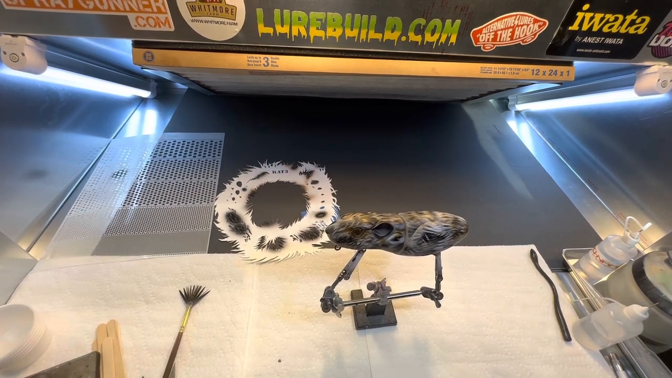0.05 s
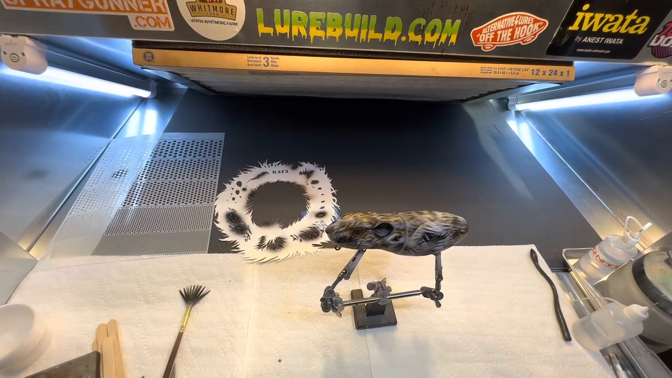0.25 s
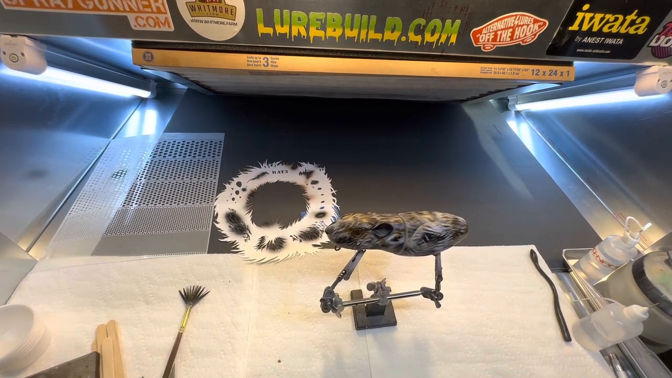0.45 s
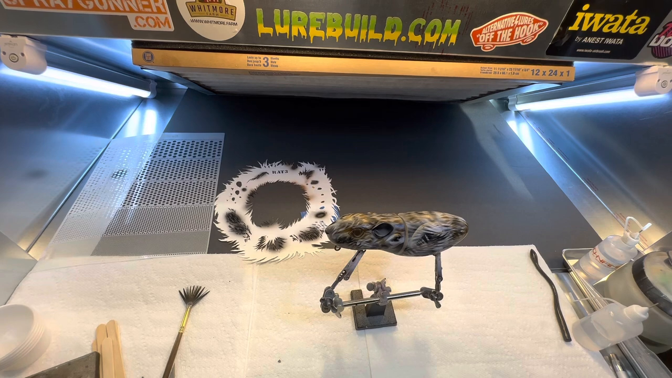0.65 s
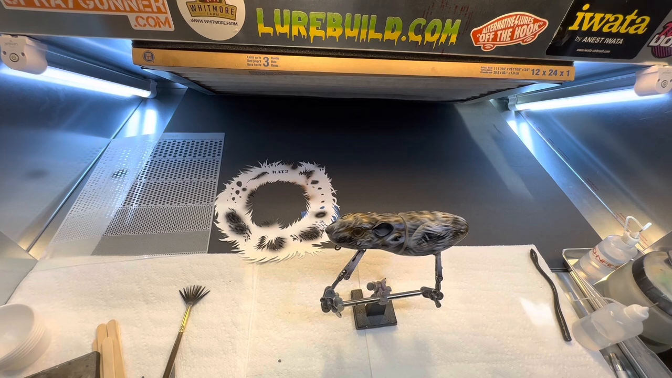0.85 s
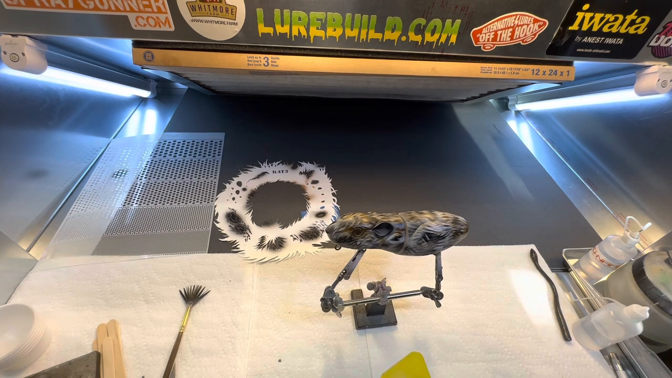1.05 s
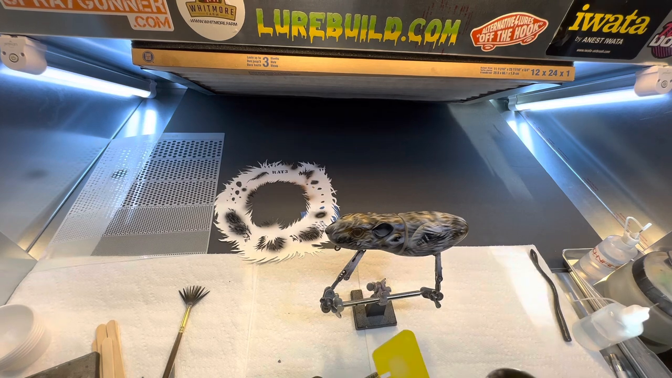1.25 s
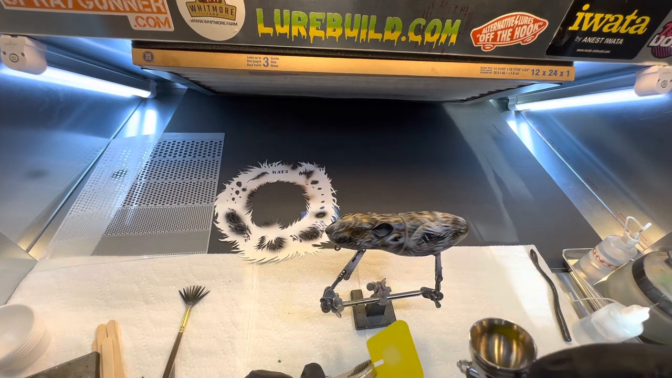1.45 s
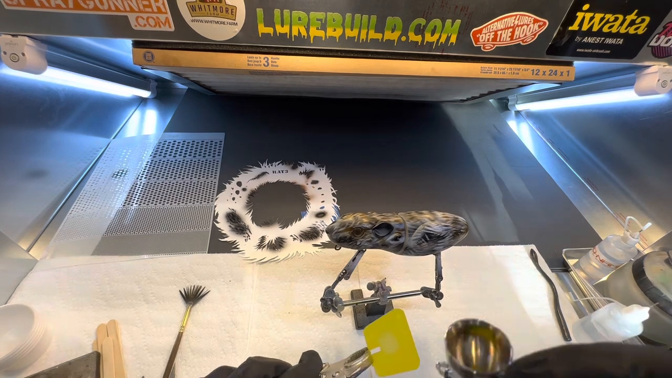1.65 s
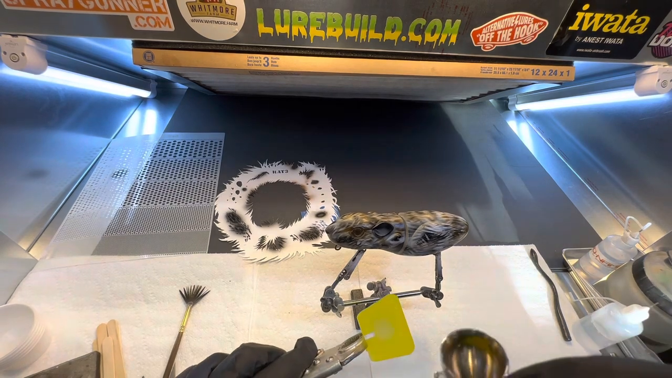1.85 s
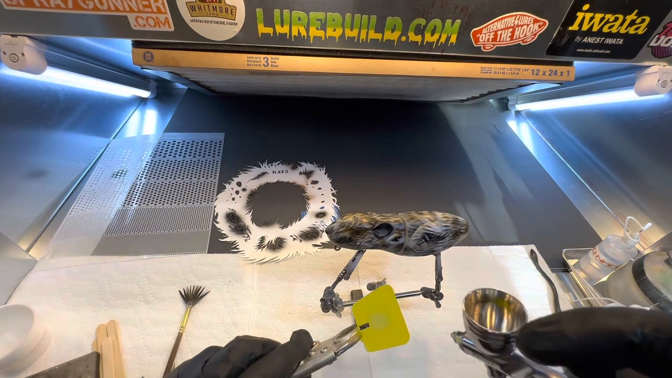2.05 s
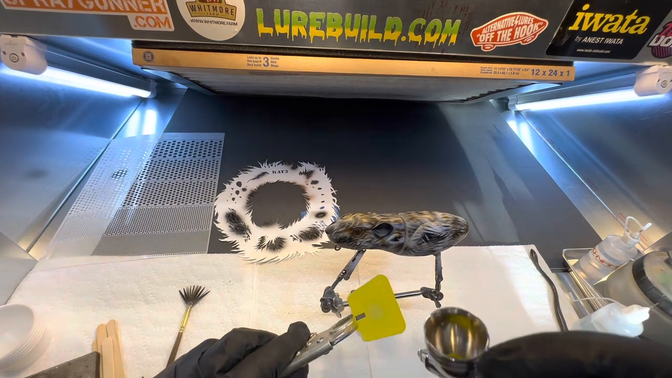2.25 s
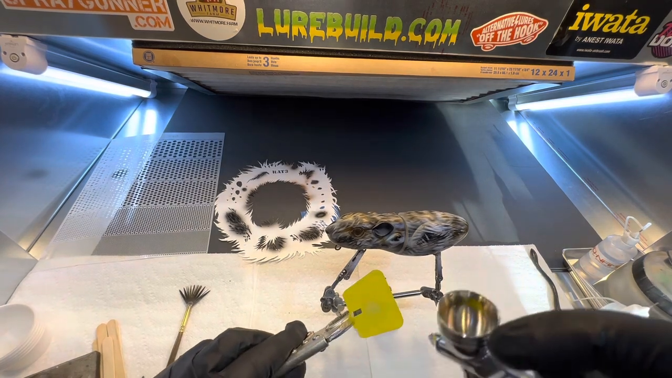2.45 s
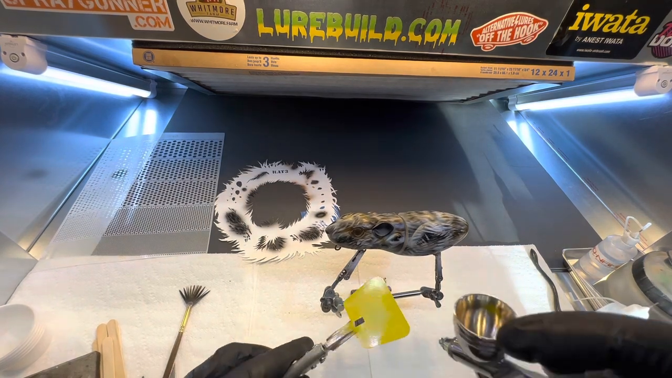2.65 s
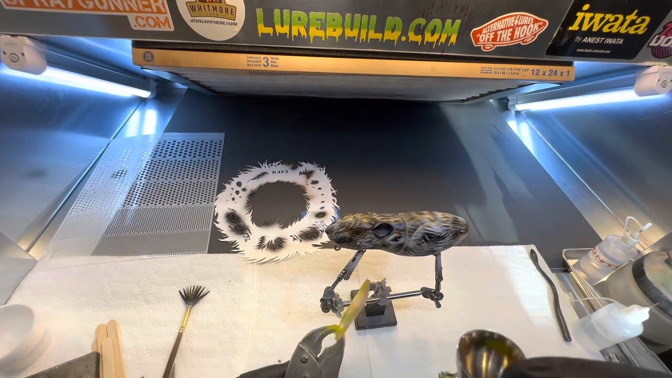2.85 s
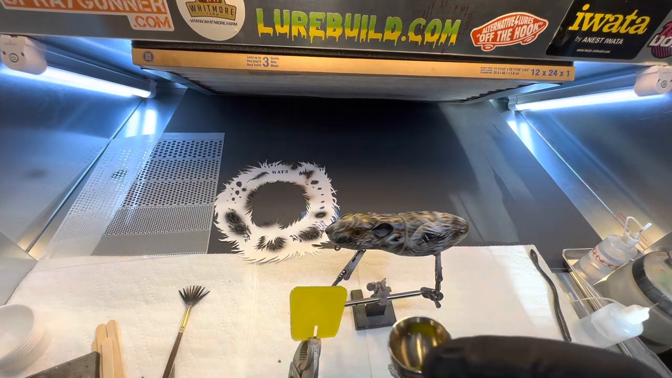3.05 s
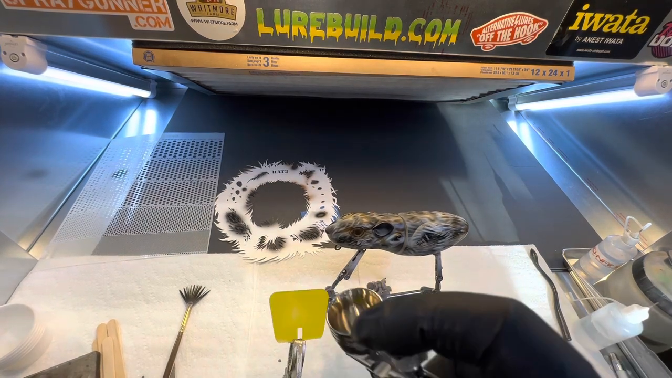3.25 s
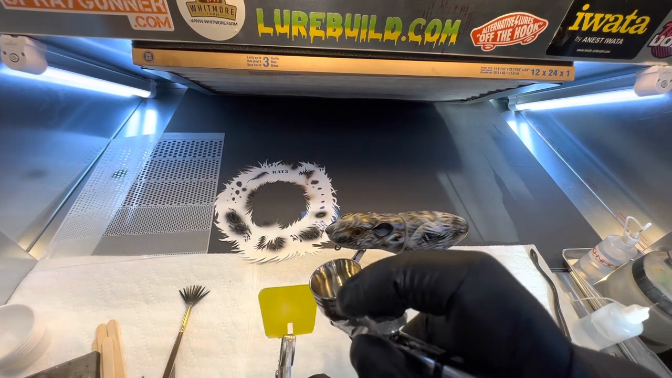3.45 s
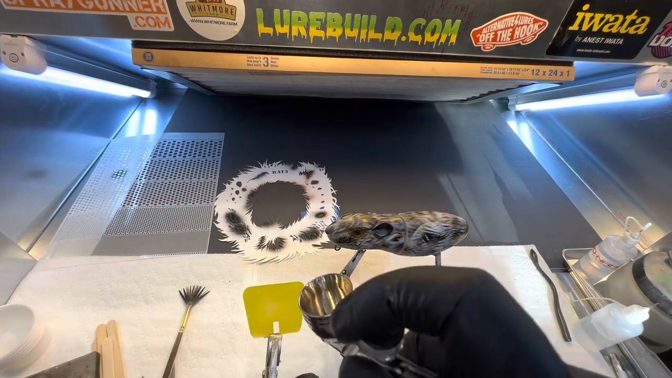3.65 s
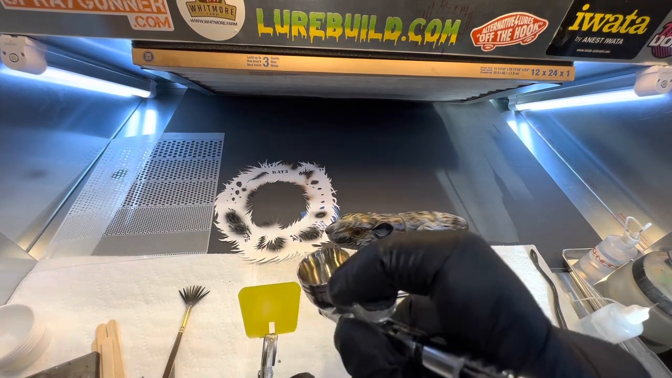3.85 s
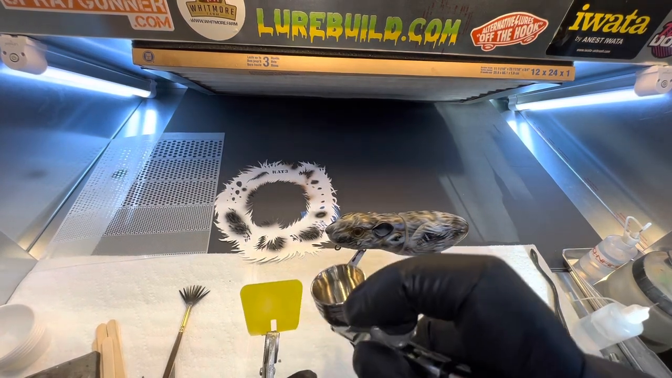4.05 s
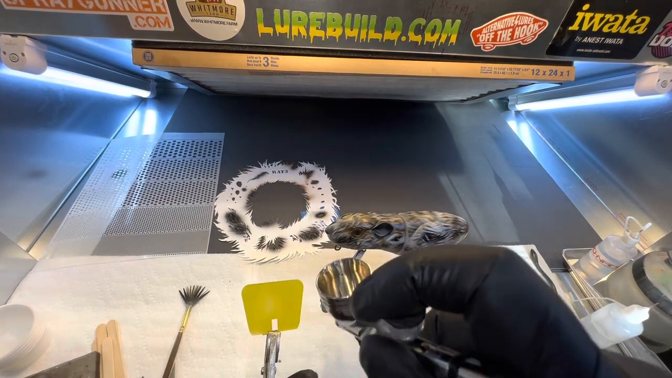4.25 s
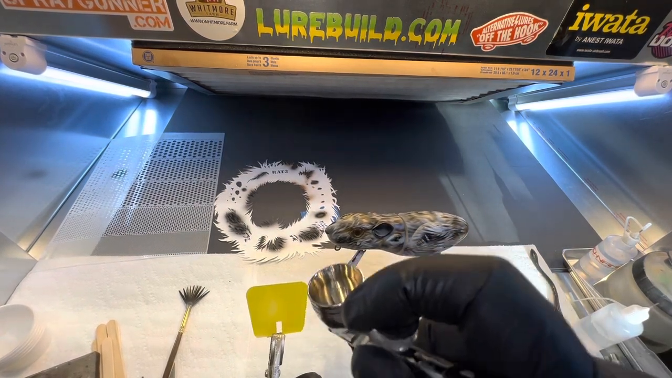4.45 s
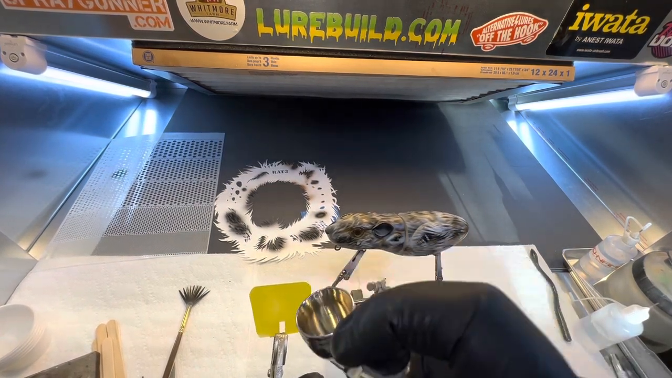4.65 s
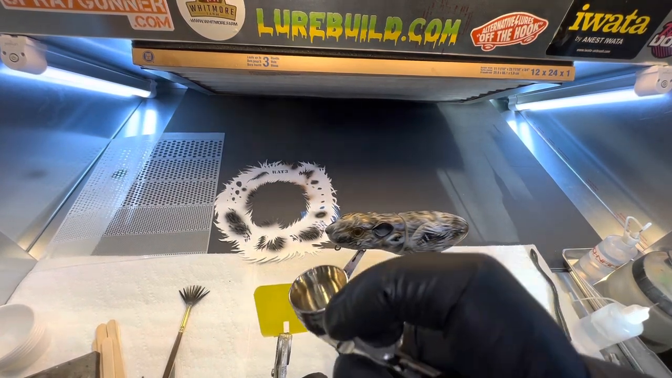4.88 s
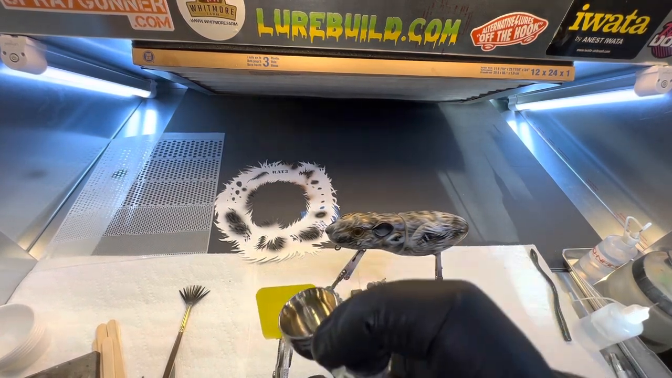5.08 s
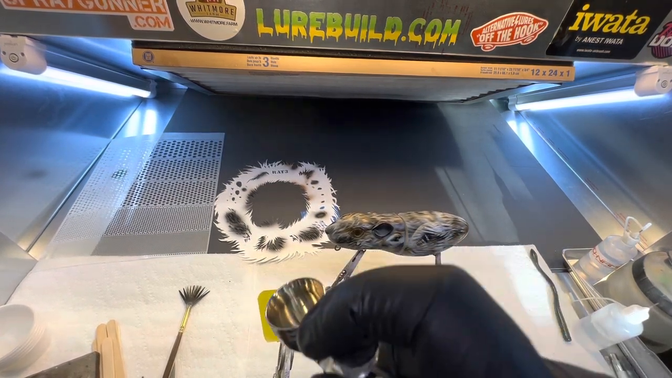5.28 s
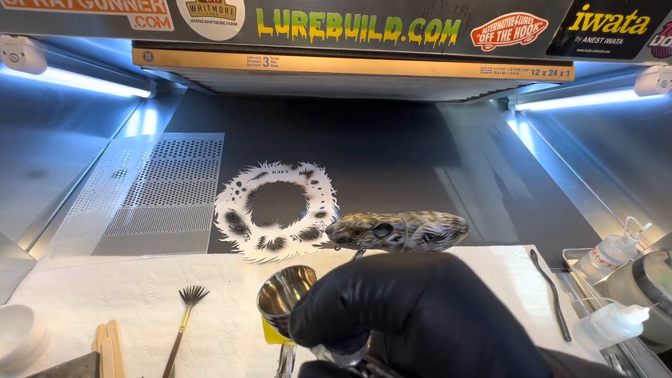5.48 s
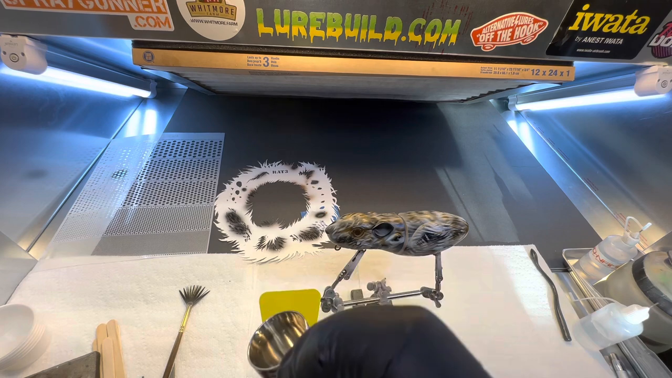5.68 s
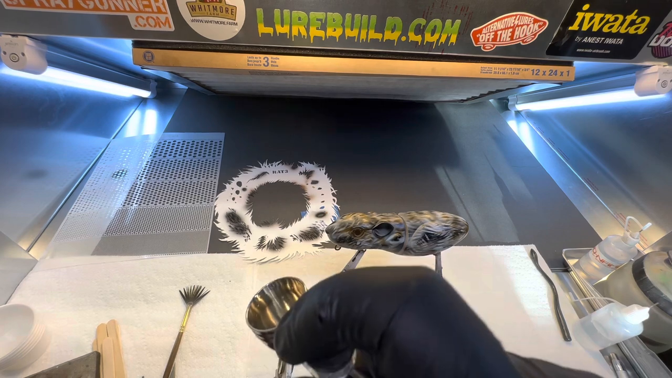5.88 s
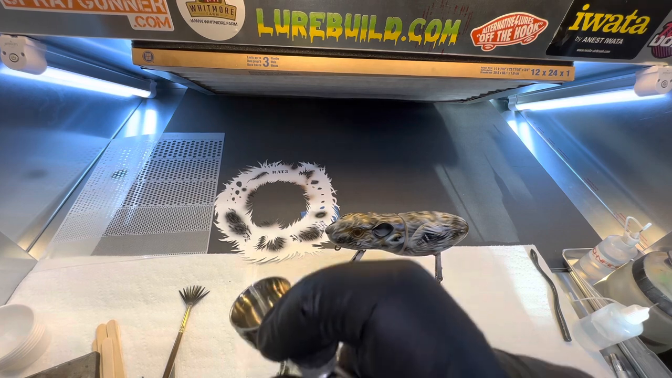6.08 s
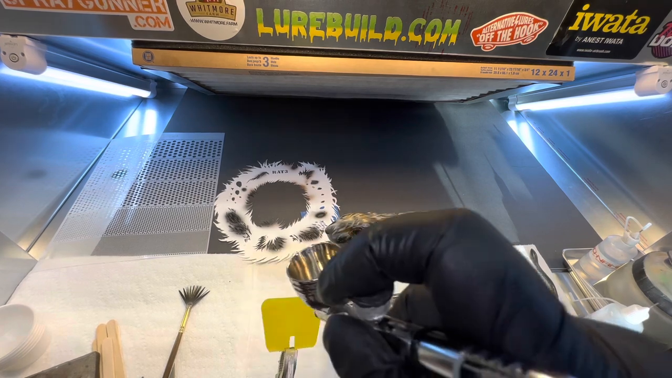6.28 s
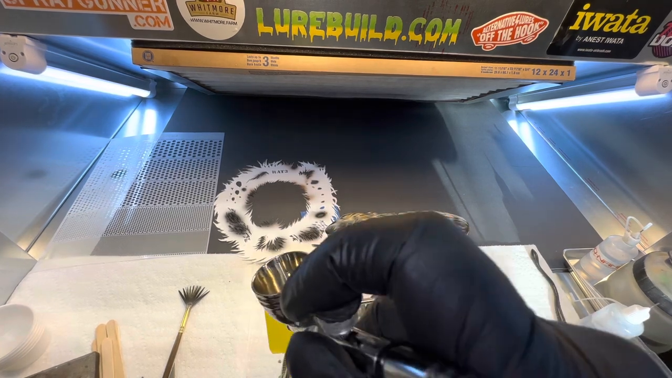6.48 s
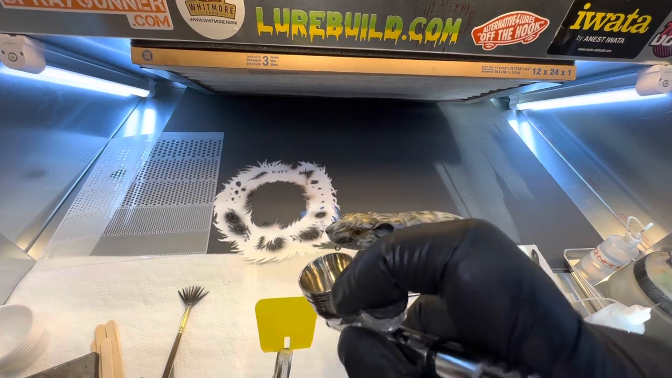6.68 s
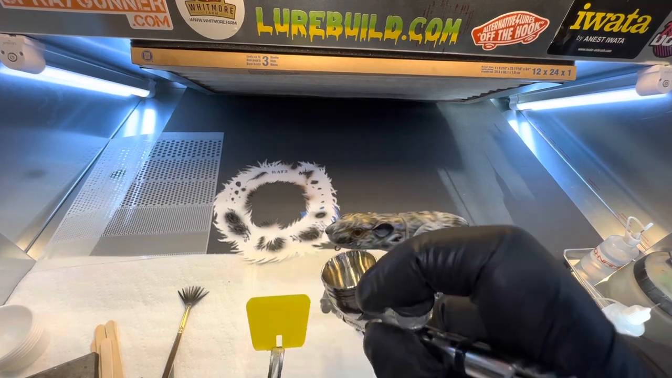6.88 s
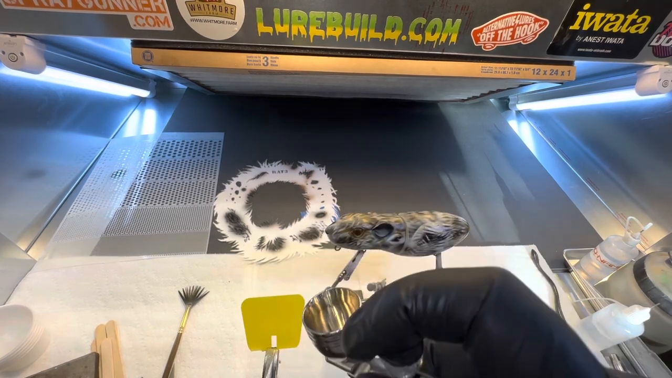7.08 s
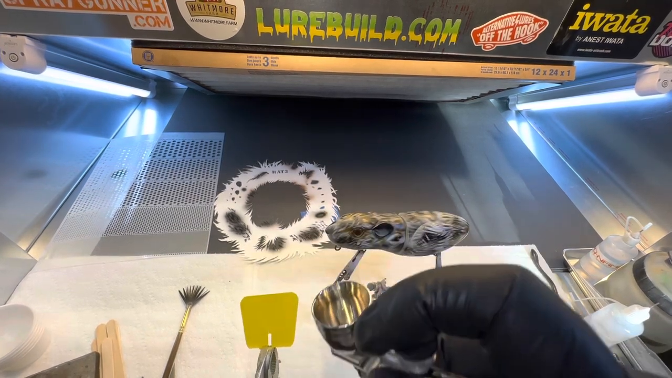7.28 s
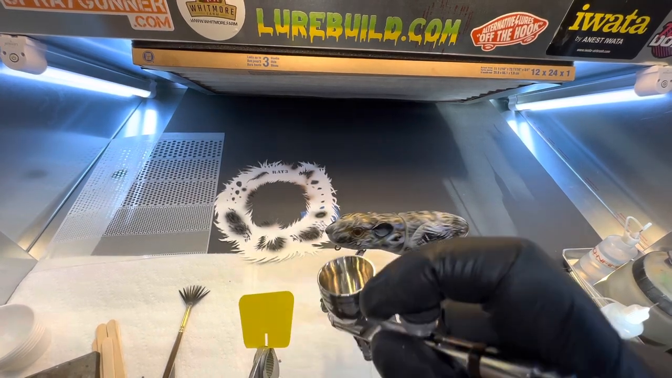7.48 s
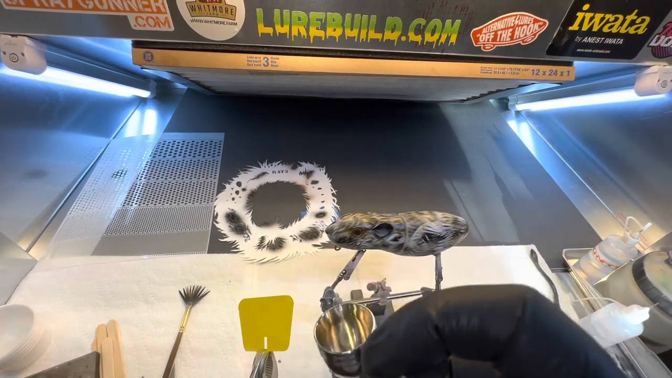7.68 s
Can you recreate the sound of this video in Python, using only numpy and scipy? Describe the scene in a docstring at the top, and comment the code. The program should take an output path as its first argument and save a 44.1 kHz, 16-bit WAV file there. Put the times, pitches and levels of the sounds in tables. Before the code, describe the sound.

A spray booth fan rumbles and booms unevenly under a bright, fluttering airbrush hiss. A mid-pitched rush fades early, and something taps the bench with quick bounces. A switch snaps with a puff of air and a brief falling whistle; a small piston compressor catches and throbs. The airbrush stops for under a second, then sprays a card close to the stereo microphones over the steady motor.

```python
"""Spray booth with a compressor start

An exhaust fan rumbles and booms as shaped noise, and an airbrush hisses as high, fluttering noise.
A tap and a switch snap ring the bench and puff air; vented air whistles downward as a sinking sine.
A twin-piston compressor starts and throbs, built from multiples of its shaft speed, magnetic tones and
intake noise. The airbrush pauses, then sprays a card close to the microphones."""
import sys
import numpy as np
from scipy import signal
from scipy.fft import rfft, irfft, next_fast_len
from scipy.io import wavfile
from scipy.ndimage import uniform_filter1d, map_coordinates

SR = 44100
rng = np.random.default_rng(int(sys.argv[2]) if len(sys.argv) > 2 else 0)


def master_out(mix):
    """Clip the mix to full scale and print it as 16-bit PCM to the path in sys.argv[1]."""
    frames = np.transpose(np.atleast_2d(mix))
    ceiling = np.clip(frames, -1, 1)
    pcm = np.round(ceiling * 32767).astype(np.int16)
    wavfile.write(sys.argv[1], SR, pcm)


N = 340452


def amp(db):
    """Gain of a level in dB."""
    return 10 ** (np.asarray(db) / 20)


def unit(x):
    """x at rms 1."""
    return x / np.sqrt(np.mean(x ** 2))


def columns(rows, at, scale=lambda v: v):
    """Every column after the first, interpolated at the given places."""
    first, *cols = np.transpose(rows)
    return np.array([np.interp(scale(at), scale(first), c) for c in cols])


def wobble(rate, step=1):
    """A smooth random curve, rate knots a second, read at every step-th sample."""
    knots = rng.standard_normal(int(N * rate / SR) + 4)
    return map_coordinates(knots, [np.arange(0, N, step) * rate / SR])


def ramp(t, start_s, length_s):
    """0 before start_s, 1 once length_s has passed."""
    return np.clip((t - start_s) / length_s, 0, 1)


# how alike left and right are in broad noise, by frequency, with opposite phase around 10.4-11.9 kHz:
# (frequency [Hz], likeness [0-1], phase by which left leads [rad])
STEREO_LIKENESS = [(60, .97, 0), (200, .97, 0), (340, .8, 0), (600, .3, 2), (1500, .35, 2), (2500, .3, 1.8),
                   (7500, .15, 2), (9900, .5, 1), (10400, 1, np.pi), (11900, 1, np.pi), (13000, .75, 5),
                   (13900, 1, 2 * np.pi), (15000, 1, 2 * np.pi), (15800, .55, 7)]


def rush(spectrum, patchy_db):
    """Air noise of a given spectrum [dB per Hz], in patches of random gain, spread over left and right."""
    grains = signal.stft(rng.standard_normal((2, N)), nperseg=512)[2]
    patches = uniform_filter1d(rng.standard_normal(grains.shape[1:]), 6, axis=0)  # across frequency
    patches = uniform_filter1d(patches, 14, axis=1)  # across time
    pair = signal.istft(grains * amp(patchy_db * unit(patches)), nperseg=512)[1][:, :N]
    m = next_fast_len(N)
    a, b = rfft(unit(pair), m)
    hz = np.fft.rfftfreq(m, 1 / SR) + 1  # keeps the logarithm finite
    alike, lead = columns(STEREO_LIKENESS, hz, np.log)
    # mixing two independent noises sets how alike left and right are
    turn = np.arccos(np.clip(alike, 0, 1)) / 2
    left = (np.cos(turn) * a + np.sin(turn) * b) * np.exp(1j * lead / 2)
    right = (np.cos(turn) * a - np.sin(turn) * b) * np.exp(-1j * lead / 2)
    levels = amp(columns(spectrum, hz, np.log))
    return np.sqrt(SR / 2) * irfft(levels * [left, right], m)[:, :N]


# exhaust fan and duct, before the slow swell: (frequency [Hz], left [dB per Hz], right [dB per Hz])
FAN_SPECTRUM = [(25, -78, -78), (45, -74, -76), (65, -67, -68), (75, -59, -60), (86, -66, -67),
                (100, -65, -67), (155, -59, -60), (200, -65, -67), (240, -65, -68), (290, -62, -65),
                (335, -61, -66), (375, -70, -73), (450, -71, -69), (700, -73, -76), (850, -72, -74),
                (1250, -78, -80), (1600, -80, -81), (1950, -76.5, -78), (2250, -81, -82),
                (2900, -81.5, -82.5), (5000, -88, -90), (10400, -93, -93), (12500, -90, -90),
                (16000, -94, -94)]


def fan_rumble():
    """Turbulent air in the duct, steady on the whole with a gentle swell."""
    return amp(1.3 * wobble(1.86)) * rush(FAN_SPECTRUM, patchy_db=1.34)


# low boom of the duct, before its lumps: (frequency [Hz], left [dB per Hz], right [dB per Hz])
BOOM_SPECTRUM = [(100, -79, -79), (138, -55.5, -57.5), (164, -55, -58), (185, -70, -73),
                 (227, -100.5, -103)]


def duct_boom():
    """The duct booms in uneven lumps: low noise with a random level."""
    return amp(2.6 * wobble(6)) * rush(BOOM_SPECTRUM, patchy_db=2.0)


# mid-pitched rush at time zero: (frequency [Hz], left [dB per Hz], right [dB per Hz])
RUSH_SPECTRUM = [(297, -101, -93), (550, -66.5, -68.5), (874, -85, -79), (1380, -69, -74),
                 (1700, -97, -103), (2500, -110, -110)]
RUSH_DB_PER_S, RUSH_END_S, RUSH_FADE_S = -3.5, 1.2, 0.38  # steady sinking, then the final fade


def fading_rush(t):
    """A mid-pitched rush of noise that sinks and fades out early."""
    fade = amp(RUSH_DB_PER_S * t) * (1 - ramp(t, RUSH_END_S, RUSH_FADE_S))
    return fade * rush(RUSH_SPECTRUM, patchy_db=3.0)


# air leaving the nozzle: (frequency [Hz], left relative level [dB], right relative level [dB])
JET_SPECTRUM = [(3000, -100, -100), (5000, -88, -92), (6000, -83, -92), (8000, -83, -89), (9000, -84, -81),
                (10000, -82, -80), (11000, -76, -76), (12500, -76, -76), (14000, -74, -74),
                (16000, -75, -75)]
# spray striking the card: (frequency [Hz], left relative level [dB], right relative level [dB])
SPLASH_SPECTRUM = [(1200, -95, -95), (2600, -85, -85), (3200, -80, -84), (4000, -84, -87), (4800, -77, -84),
                   (5300, -74, -85), (5800, -78, -87), (8000, -80, -86), (10300, -90, -90),
                   (13000, -100, -100)]
# loudness of the open jet as the hand moves, before flutter: (time [s], level [dB])
SPRAY_LEVEL = [(0.0, -33.5), (0.63, -33), (0.9, -34), (1.17, -34.5), (1.35, -37.5), (1.62, -36.5),
               (1.85, -35), (2.13, -34), (2.45, -32), (2.6, -35), (3.42, -36.5), (3.65, -32.5),
               (3.78, -35.5), (3.95, -33), (4.14, -35.5), (4.66, -30), (4.88, -31), (5.02, -31.5),
               (5.22, -32.5), (5.35, -31), (5.56, -33.5), (5.74, -29.5), (5.92, -34.5), (6.62, -35.5),
               (6.78, -31.5), (6.9, -35), (7.72, -36)]
# trigger held down: (start [s], end [s], level of splash on the card before flutter [dB])
TRIGGER_HELD = [(-1, 2.6, -54), (3.385, 9, -42)]
OPEN_S, CLOSE_S, AIM_S = .035, .08, .4  # valve opens, valve closes, spray finds the card
LEAK_DB = -30  # jet with the valve shut, relative to open


def airbrush(t):
    """The jet at the nozzle and the splash on the card flutter together while the trigger gates both."""
    held, splash_gain = 0, 0
    for start, end, splash_db in TRIGGER_HELD:
        closing = ramp(t, end, CLOSE_S)
        held = held + ramp(t, start, OPEN_S) - closing
        splash_gain = splash_gain + amp(splash_db) * (ramp(t, start, AIM_S) - closing)
    flutter_db = 0.31 * wobble(13) + .5 * wobble(7)
    jet_db = columns(SPRAY_LEVEL, t) + LEAK_DB * (1 - held) + flutter_db
    jet = amp(jet_db) * unit(rush(JET_SPECTRUM, patchy_db=2.5))
    splash = splash_gain * amp(flutter_db) * unit(rush(SPLASH_SPECTRUM, patchy_db=2.0))
    return jet + splash


# rattle of the bench: (frequency [Hz], left relative level [dB], right relative level [dB])
RATTLE_SPECTRUM = [(120, -78, -78), (300, -64, -59), (1000, -64, -61), (1400, -66, -78), (2170, -71, -73),
                   (5000, -89, -78)]
# puff of air: (frequency [Hz], left relative level [dB], right relative level [dB])
PUFF_SPECTRUM = [(300, -82, -83), (735, -59, -57), (980, -56.5, -57), (1500, -62, -67), (2400, -71, -73),
                 (2900, -65.5, -67), (4650, -61.5, -65), (5100, -65, -75), (5670, -57, -62),
                 (6500, -61.5, -68), (7200, -68, -79), (8550, -61, -64), (11100, -70, -66.5),
                 (16000, -100, -102)]
# ringing modes of the bench: (frequency [Hz], relative level before scatter [dB], t60 [s])
BENCH_MODES = [(164, -8, 0.078), (407, -8, 0.027), (607, -14, 0.055), (800, -16.5, 0.075),
               (1073, -4, 0.043), (1277, -17, 0.057), (1600, -21, .04), (1900, -13, 0.025),
               (2820, -19, .03)]
# contacts, a tap with its bounces and the switch's rattling snap: (time [s], bench ring [dB],
# rattle [dB], puff [dB], t60 of rattle and puff [s], ring left over right [dB])
CONTACTS = [(1.0332, -19.5, -36, -43, .12, 1), (1.042, -23, -36, -58, .25, 2),
            (1.052, -33, -39, -58, .5, 0), (2.4348, -19, -46, -25.5, .1, -5),
            (2.4415, -28, -46, -25.5, .025, -6), (2.444, -43, -50, -25, .006, 0),
            (2.448, -30, -41, -30, 0.47, 6)]
HISS_S, HISS_END_S, HISS_DB = 2.46, 2.49, -42  # the switch's valve stands open


def hits(t):
    """Each contact rings the bench in decaying modes, rattles it and lets off a dying puff of noise."""
    out = np.zeros((2, N))
    rattle = unit(rush(RATTLE_SPECTRUM, patchy_db=1.0))
    air = unit(amp(1.7 * wobble(500)) * rush(PUFF_SPECTRUM, patchy_db=0.0))  # the air sputters
    u = t[:SR // 2]
    for s, ring_db, rattle_db, puff_db, t60, pan_db in CONTACTS:
        at = slice(round(s * SR), round(s * SR) + SR // 2)
        ring = 0
        for hz, level, life in BENCH_MODES:
            scatter_db = rng.normal(0, 0.48, (2, 1))  # left and right differ a little
            ring = ring + amp(level + scatter_db - 60 * u / life) * np.sin(2 * np.pi * hz * u)
        ring_gain = amp(ring_db + np.array([[pan_db / 2], [-pan_db / 2]]))
        tail = amp(-60 * u / t60) * (amp(rattle_db) * rattle[:, at] + amp(puff_db) * air[:, at])
        # soft onsets, time constants in seconds
        out[:, at] += (1 - np.exp(-u / 0.0012)) * ring_gain * ring
        out[:, at] += (1 - np.exp(-u / 0.0004)) * tail
    # the switch's valve hisses on for a moment and shuts
    valve = ramp(t, HISS_S, 0.013) - ramp(t, HISS_END_S, .008)
    return out + amp(HISS_DB) * air * valve


VENT_S, VENT_HZ, VENT_SAG_HZ_PER_S = 2.45, 1005, 600  # start, starting pitch, downward glide
VENT_DB, VENT_T60_S = -38.5, .7  # starting peak level before panning, decay


def vent(t):
    """A breathy whistle, a phase-jittered sine, sinks as the line empties after the switch."""
    u = np.clip(t - VENT_S, 0, .3)
    cycles = VENT_HZ * u - VENT_SAG_HZ_PER_S * u ** 2 / 2
    whistle = np.sin(2 * np.pi * cycles + 0.73 * wobble(60))
    level = amp(VENT_DB - 60 * u / VENT_T60_S + [[1.5], [-1.5]])  # leans left
    return level * ramp(u, 0, 0.021) * (1 - ramp(u, .2, .1)) * whistle


START_S, KICK_S = 2.46, 0.055  # the motor is switched on; time to catch
START_HZ, SPIN_UP_S = 27.75, .6  # shaft turns per s as it catches; time to full speed
RUN_HZ, CREEP_HZ_PER_S = 28.441, .0108  # full speed before a slow upward creep
# the bench rocks hard while the motor gathers speed
SURGE_S, SURGE_HOLD_S, SURGE_FADE_S, SURGE_DB = 2.64, 0.3, 0.22, 9  # dB before the left/right tilt
ROCKING_GROWTH_DB_PER_S = 0.64  # steady growth from the start on
THUMP_IDLE_DB, THUMP_FULL_S = -9, 2.67  # the frame shakes lightly until the pistons meet pressure
KNOCK_IDLE_DB, KNOCK_FULL_S, LOAD_S = -10, 2.83, 0.03  # the valves start to slam


def motor(t):
    """Start-up curves: shaft speed [Hz], then rocking, thump and knock [dB], and the surge [0-1]."""
    full_speed = RUN_HZ + CREEP_HZ_PER_S * (t - START_S)
    speed = START_HZ + (full_speed - START_HZ) * ramp(t, START_S, SPIN_UP_S)
    off_db = -30 * (1 - ramp(t, START_S, KICK_S))
    surge = ramp(t, SURGE_S, 0.018) - ramp(t, SURGE_S + SURGE_HOLD_S, SURGE_FADE_S)
    rocking_db = off_db - 1.0 + SURGE_DB * surge + ROCKING_GROWTH_DB_PER_S * (t - START_S)
    thump_db = off_db + THUMP_IDLE_DB * (1 - ramp(t, THUMP_FULL_S, 0.19))
    knock_db = off_db + 2.0 + KNOCK_IDLE_DB * (1 - ramp(t, KNOCK_FULL_S, LOAD_S))
    return speed, rocking_db, thump_db, knock_db, surge


# compressor intake and valves, before the start-up gain:
# (frequency [Hz], left [dB per Hz], right [dB per Hz])
INTAKE_SPECTRUM = [(400, -85, -85), (700, -73, -75), (850, -70, -71), (1050, -70.5, -71.5),
                   (1300, -74, -76), (1650, -77, -79), (1950, -77, -79), (2300, -81, -82), (3200, -81, -84),
                   (4000, -83, -86), (5000, -78, -84), (7000, -87, -92), (9000, -90, -85),
                   (10400, -99, -99), (16000, -105, -105)]


def intake(t):
    """Air rushing through the intake and valves, louder as the valves start to slam."""
    knock_db = motor(t)[3]
    return amp(0.38 * knock_db + 0.7) * rush(INTAKE_SPECTRUM, patchy_db=1.5)


# tones that sing out while the motor strains up to speed:
# (multiple of the pull, multiple of the shaft speed, start [s], end [s], boost [dB])
STRAIN_BOOSTS = [(1, 0, 2.47, 2.62, 13), (0, 39, 2.57, 2.81, 12), (0, 22, 2.72, 3.05, 11),
                 (0, 26, 2.71, 2.82, 5), (0, 28, 2.71, 2.84, 8), (0, 38, 2.82, 3.04, 7),
                 (0, 34, 2.87, 3.05, 4)]


def strain(t, pull, k):
    """Extra gain of one tone while the motor strains."""
    boost_db = 0
    for p, m, start, end, db in STRAIN_BOOSTS:
        if (p, m) == (pull, k):
            boost_db = boost_db + db * (ramp(t, start, .03) - ramp(t, end, 0.041))
    return amp(boost_db)


def tone(cycles, left_db, right_db, lead):
    """A steady tone at rms levels in dB, with its own level and phase on left and right."""
    angle = 2 * np.pi * (cycles % 1) - np.array([[0], [lead]])
    return np.sqrt(2) * amp([[left_db], [right_db]]) * np.cos(angle.astype(np.float32))


# the two blows of a turn: (first at [share of a turn], second after [share of a turn],
# strength of second over first, turn by the body [rad], scatter [rad])
THUMP_BLOWS, KNOCK_BLOWS = (.771, .496, .4, 1.7, .35), (.851, .464, .7, 2.8, .7)


def blow_phase(k):
    """Starting phase [rad] of multiple k as two blows a turn would set it, smeared by the casing."""
    first, second, strength, turned, scatter = THUMP_BLOWS if k <= 12 else KNOCK_BLOWS
    both = np.angle(1 + strength * np.exp(-2j * np.pi * k * second))
    return both - 2 * np.pi * k * first + turned + scatter * rng.standard_normal()


# multiples of the shaft speed, before the start-up and shaking gains:
# (multiple, left [dB], right [dB], phase by which left leads [rad])
SHAFT_TONES = [(2, -36, -51, -0.7), (3, -41, -45, 0.0), (4, -34, -34, -0.2), (6, -45, -43, 0.0),
               (7, -46, -50, 1.6), (8, -42, -53, -0.5), (9, -57, -60, -1.7), (10, -54, -60, -2.2),
               (11, -60, -58, 1.5), (12, -45, -44, -0.1), (13, -61, -59, -0.5), (14, -56, -66, -0.7),
               (15, -67, -62, 1.9), (16, -54, -79, -2.4), (17, -64, -66, 3.0), (18, -74, -61, -1.4),
               (19, -72, -57, 1.9), (20, -57, -53, -0.8), (21, -74, -60, -2.8), (22, -60, -72, -1.6),
               (23, -67, -67, -0.1), (24, -55, -64, -2.8), (26, -45, -49, 2.4), (27, -53, -56, -3.1),
               (28, -45, -53, 2.2), (29, -57, -62, -2.3), (30, -53, -50, -0.6), (31, -63, -57, -2.3),
               (32, -48, -57, 2.5), (33, -57, -74, 2.3), (34, -52, -61, 2.5), (35, -49, -52, -1.3),
               (36, -50, -54, 2.3), (37, -50, -70, -1.8), (38, -53, -56, -2.8), (39, -61, -57, -2.4),
               (40, -54, -65, -0.5), (41, -66, -65, 1.9), (42, -61, -56, 0.4), (43, -63, -62, -2.1),
               (44, -70, -60, -2.8), (45, -68, -67, -1.2), (46, -57, -67, 0.0), (47, -65, -65, 1.5),
               (48, -60, -60, -3.1), (50, -62, -63, -0.0), (51, -63, -70, -1.2), (52, -73, -74, -2.7),
               (53, -71, -66, -1.1), (54, -65, -66, 1.6), (56, -68, -69, -0.3), (58, -69, -67, 1.6),
               (59, -71, -71, 3.0), (60, -70, -66, -2.6), (61, -68, -72, -3.0), (62, -64, -70, 2.6),
               (63, -66, -76, 1.9), (64, -72, -65, -2.7), (65, -66, -74, 2.3), (66, -62, -64, -1.8),
               (68, -70, -74, -2.4), (70, -70, -80, 0.4)]
# the motor's magnetic pull mixed with the turning, before the start-up and shaking gains:
# (multiple of the pull, multiple of the shaft speed, left [dB], right [dB], left leads [rad])
MAGNETIC_TONES = [(-1, 26, -59, -65, -2.6), (-1, 28, -63, -64, -1.8), (-1, 30, -53, -54, 2.8),
                  (-1, 32, -56, -58, 2.4), (-1, 34, -57, -61, 0.5), (-1, 36, -71, -61, -1.0),
                  (-1, 38, -59, -61, 1.1), (-1, 44, -66, -66, -3.0), (-1, 48, -69, -65, -2.0),
                  (-1, 50, -61, -80, -2.3), (-1, 51, -65, -70, -3.0), (-1, 52, -70, -64, -2.6),
                  (-1, 54, -65, -66, -1.7), (-1, 58, -67, -63, -1.9), (-1, 62, -75, -65, -1.6),
                  (1, 0, -48, -49, 0.1), (1, 2, -56, -67, -0.0), (1, 8, -57, -62, -0.7),
                  (1, 20, -58, -57, -3.0), (1, 22, -61, -52, -2.8), (1, 26, -64, -58, -1.3),
                  (1, 27, -67, -61, -2.8), (1, 28, -60, -55, 3.0), (1, 30, -56, -58, -2.6),
                  (1, 36, -67, -65, 2.3), (1, 38, -66, -62, -0.3), (1, 40, -60, -63, -1.8),
                  (1, 42, -60, -68, -1.2), (1, 46, -64, -65, 0.0), (1, 50, -72, -59, -2.0),
                  (1, 54, -71, -64, -1.4), (1, 56, -68, -64, -2.7), (1, 62, -74, -65, -0.1),
                  (2, 0, -51, -59, 0.1), (2, 24, -74, -62, 0.9), (2, 27, -71, -62, -1.6),
                  (2, 28, -60, -64, 2.4), (2, 30, -51, -59, -2.6), (2, 32, -61, -66, -1.1),
                  (3, -10, -53, -53, 0.1), (4, 0, -61, -80, 2.2)]
PULL_HZ = 120.03  # twice the mains frequency
COARSE = 10  # the tones are worked out at every tenth sample


def compressor(t):
    """Two piston blows a turn throb as shaft multiples; magnetic tones beat against them over intake air."""
    air, running = intake(t), t > START_S
    t = t[::COARSE]
    speed, rocking_db, thump_db, knock_db, surge = motor(t)
    turns = np.cumsum(speed) * COARSE / SR
    shakes = amp(0.65 * np.array([wobble(rate, step=COARSE) for rate in (5, 7, 10, 11, 21)]))
    tilt_db = [[-1.2], [5.5]] * surge  # the surge swells more on the right
    rocking = amp(rocking_db + tilt_db) * amp(0.44 * wobble(4, step=COARSE))
    thumps, knocks = amp(thump_db + 1.24) * shakes, amp(knock_db + 0.3) * shakes

    def shaking(k):
        """Low multiples shake with the frame, high ones with the valves."""
        return (thumps if k <= 12 else knocks)[round(k) % len(shakes)]

    out = np.zeros((2, len(t)))
    for k, *heard in SHAFT_TONES:
        drive = rocking if k <= 2 else shaking(k)
        cycles = k * turns + blow_phase(k) / (2 * np.pi)
        out += drive * strain(t, 0, k) * tone(cycles, *heard)
    for pull, k, *heard in MAGNETIC_TONES:
        cycles = pull * PULL_HZ * t + k * turns + rng.random()
        out += shaking(k) * strain(t, pull, k) * tone(cycles, *heard)
    out += amp(thump_db - 52) * np.cos(2 * np.pi * turns)  # the unbalanced shaft itself
    return running * (signal.resample_poly(out, COARSE, 1, axis=1)[:, :N] + air)


def scene():
    """Everything in the booth, from the background to the compressor."""
    t = np.arange(N) / SR
    background = fan_rumble() + duct_boom() + fading_rush(t)
    return background + airbrush(t) + hits(t) + vent(t) + compressor(t)


TOP_HZ = 15750  # upper band limit


def record(dry):
    """A sharp low-pass removes everything from the band limit up."""
    m = next_fast_len(N + 8192)
    passed = np.fft.rfftfreq(m, 1 / SR) < TOP_HZ
    return irfft(rfft(dry, m) * passed, m)[:, :N]


dry = scene()
out = record(dry)
master_out(out)
```